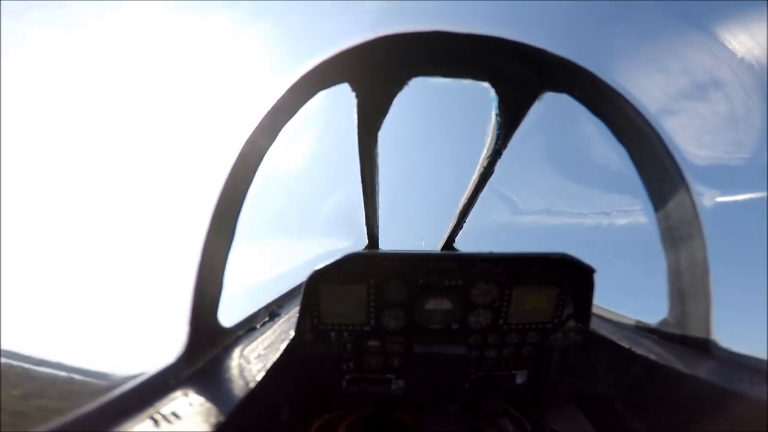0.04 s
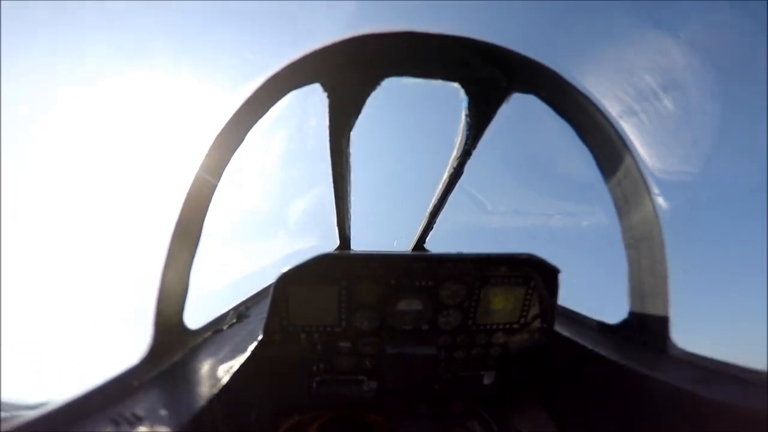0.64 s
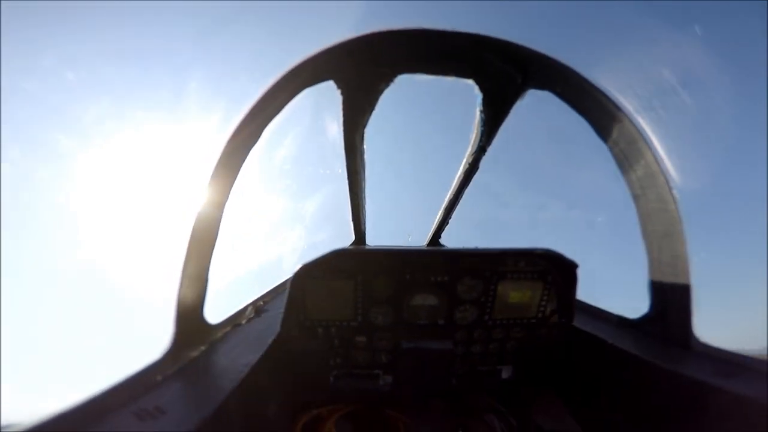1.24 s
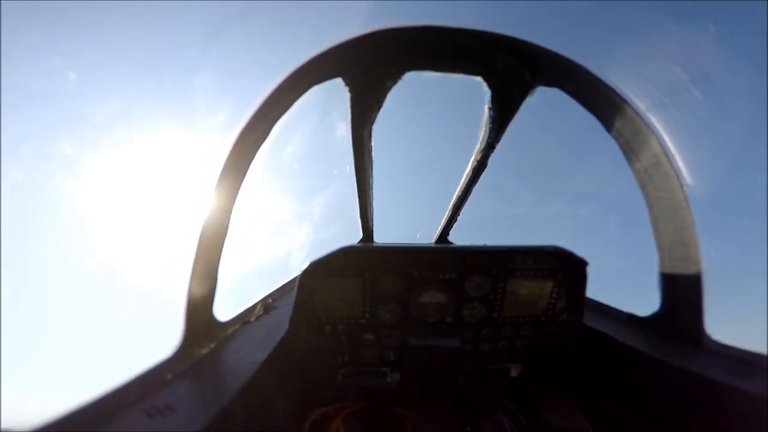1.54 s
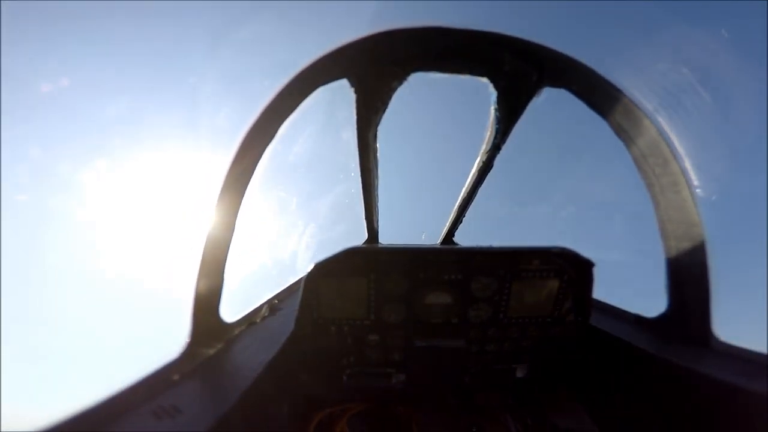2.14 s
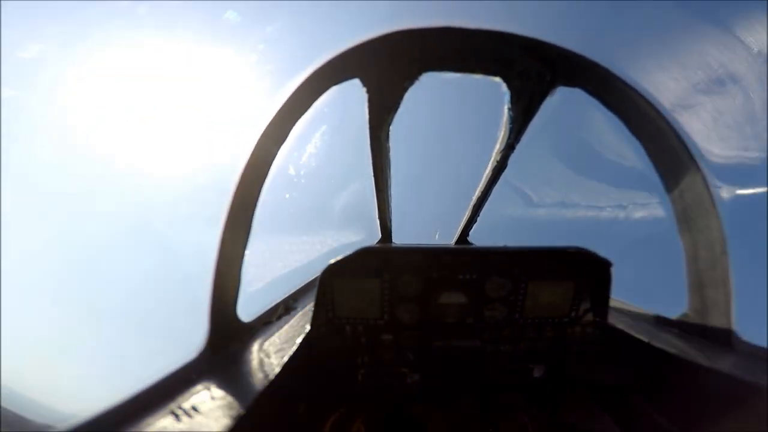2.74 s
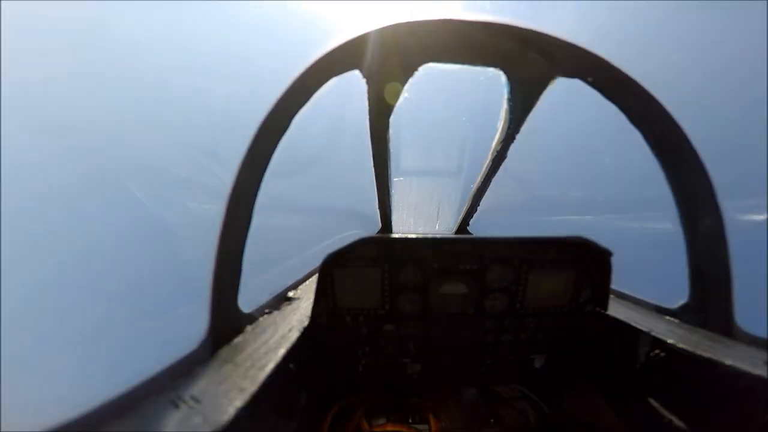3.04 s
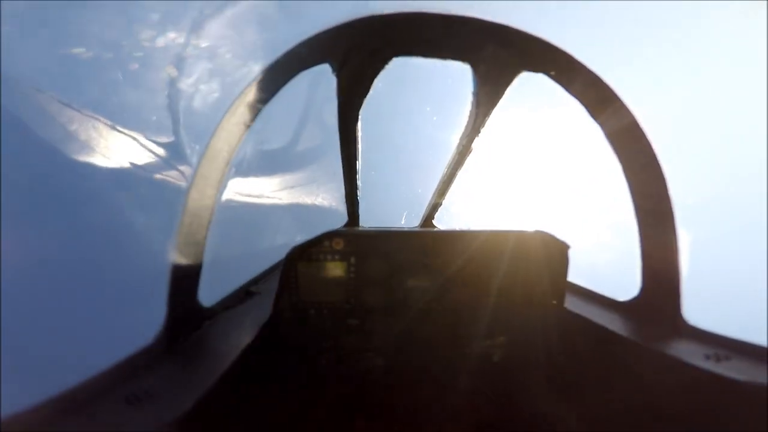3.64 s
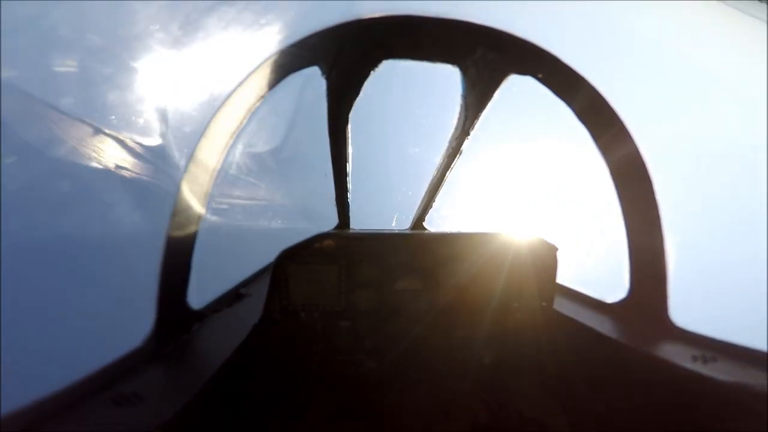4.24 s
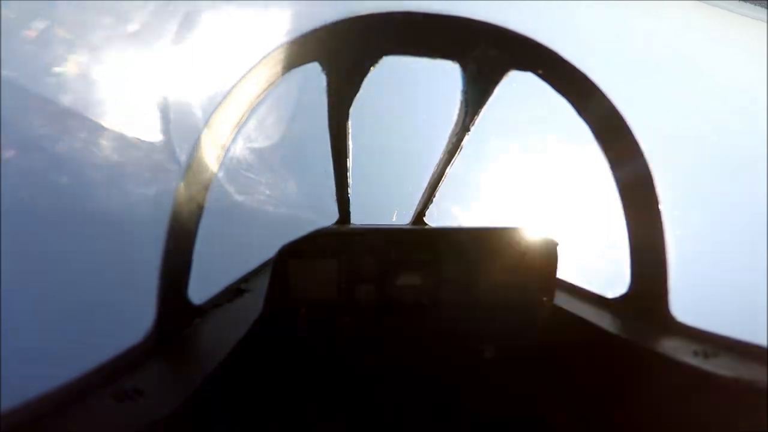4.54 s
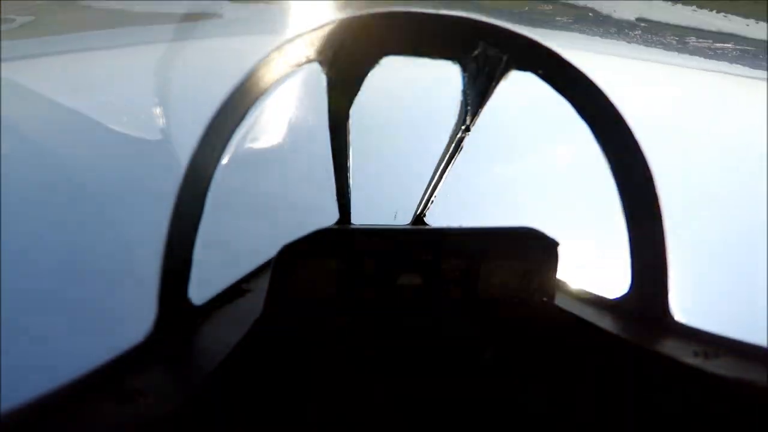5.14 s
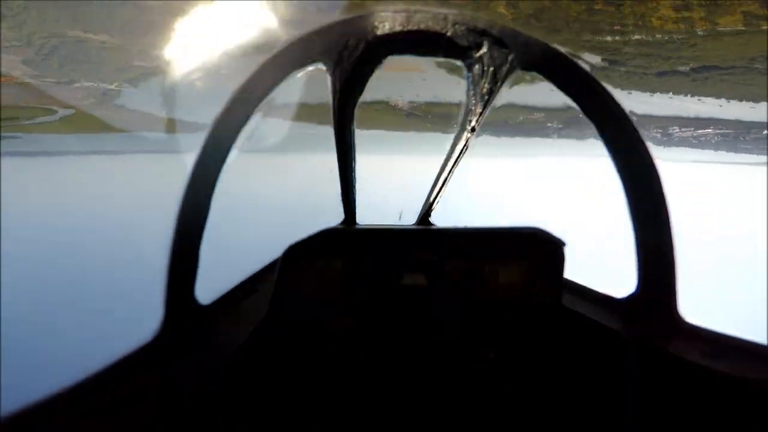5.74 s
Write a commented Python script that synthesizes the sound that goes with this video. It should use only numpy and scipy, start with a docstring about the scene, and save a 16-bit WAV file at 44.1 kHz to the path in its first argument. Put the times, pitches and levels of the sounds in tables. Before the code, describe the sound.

Twin ducted fans drone steadily inside a model jet while buffeting wind turns deeper and rougher about halfway through.

```python
"""A loud, beating hum over a low rumble of air, from a camera microphone in the cockpit of a model jet.
The hum is two electric ducted fans, slightly out of step, shaking the airframe; their whine sits on top.
Air buffets the fuselage and hisses over the canopy. About halfway the jet rolls and pulls into a dive,
and the flow turns deeper and rougher. The camera's limiter rides the loud low end."""
import sys
import numpy as np
from scipy import signal
from scipy.fft import rfft, irfft, next_fast_len
from scipy.io import wavfile
from scipy.ndimage import uniform_filter1d, minimum_filter1d, map_coordinates

SR = 44100
rng = np.random.default_rng(int(sys.argv[2]) if len(sys.argv) > 2 else 0)


def persist_wave(psi):
    """Save psi, clipped to +-1, as 16-bit WAV."""
    counts = np.round(np.clip(psi, -1, 1) * 32767).astype(np.int16)
    wavfile.write(sys.argv[1], SR, np.atleast_2d(counts).T)


N = 260190

# Whine of each fan. Each row: shaft order, relative level in dB in straight flow, then in a full pull.
FIRST_FAN_ORDERS = [(3, -54.5, -53), (4, -60.5, -58.5), (5, -73, -69.5), (7, -69, -61), (8, -80.5, -72.5),
                    (9, -73.5, -75), (10, -74, -68.5), (11, -78, -65), (13, -75, -70), (14, -78, -61),
                    (15, -77.5, -74), (17, -72, -73.5), (22, -89, -86), (24, -73, -65), (30, -99.5, -86.5)]
SECOND_FAN_ORDERS = [(5, -70.5, -59.5), (7, -66, -61.5), (9, -78, -73), (10, -65.5, -62), (11, -79, -69.5),
                     (12, -73, -64.5), (14, -79.5, -69.5), (17, -73.5, -69), (24, -76.5, -70),
                     (30, -98, -87.5)]
# Spectra of the buffeting on the fuselage. Each row: frequency in Hz, relative level in dB.
BUFFET_STRAIGHT_SPECTRUM = [(20, -27), (45, -16.5), (80, -13), (135, -5.5), (178, -4), (215, -0.5),
                            (280, -3), (330, -11.5), (410, -12.5), (480, -22), (570, -18), (700, -28),
                            (900, -41.5), (1300, -79)]
BUFFET_PULL_SPECTRUM = [(20, -32), (45, -16.5), (75, -1), (140, 2), (220, -2), (305, -8), (365, -26),
                        (450, -13), (530, -22), (595, -22.5), (700, -27), (900, -47), (1300, -80)]
# Spectra of the air over the canopy and in the ducts. Each row: frequency in Hz, relative level in dB.
HISS_STRAIGHT_SPECTRUM = [(400, -19.5), (900, -2.5), (1550, 4), (1850, -3.5), (2600, -6), (3300, -10),
                          (4250, -11.5), (5500, -9), (6500, -11.5), (7200, -18.5), (8400, -18.5),
                          (11000, -32), (12300, -24), (15000, -29.5)]
HISS_PULL_SPECTRUM = [(400, -19), (900, -3.5), (1500, -0.5), (1850, -6), (2600, -8), (3350, -13),
                      (4250, -12), (5700, -5), (7000, -17.5), (7700, -18), (9700, -28.5), (11100, -37),
                      (12200, -24), (15000, -37)]
# Resonances of the hollow fuselage and of the ducts.
# Each row: centre in Hz, width in Hz, lift in dB in straight flow, then in a full pull.
FUSELAGE_MODES = [(176.2, 27, 6.5, 0.5), (249, 17, 0, 2), (587, 32, -1, 5.5)]
DUCT_MODES = [(1374, 89, 5, 11), (2210, 110, 4, 0.5), (2630, 160, 4, 4), (3910, 170, 6, 5.5),
              (4670, 180, 3, 3.5), (6070, 230, 1.5, 9.5), (6640, 150, 0.5, 4), (7560, 200, 3, 4),
              (8200, 180, 1, 1), (9140, 250, 3.5, 2.5), (10500, 100, 3, 17), (14600, 350, 2.5, -0.5)]
# Rush of air, weakest at the top of the climb. Each row: time in seconds, relative level in dB.
AIR_RUSH = [(0.1, -40.5), (0.46, -42.5), (0.89, -42.5), (2.2, -47), (3.26, -46.5), (4.32, -42.5),
            (5.8, -44.5)]

BLADE_COUNT = 12
PULL_S, EASE_S = 3.45, 4.2  # the pull is half built, then starts to ease
HUM_DB, HUM_SINK_DB, SINK_S, SINK_HALF_LENGTH_S = -10.5, 2.5, 4.2, 0.81
OCTAVE_DB, OCTAVE_SWELL_DB, OCTAVE_DROP_DB = -45.5, 8.5, 5
OCTAVE_PEAK_S, OCTAVE_RISE_S, OCTAVE_SETTLE_S, OCTAVE_DROP_S = 2.1, 0.73, 0.9, 0.39
TIME = np.arange(N) / SR


def fan_hum(first, second, second_db, sum_db, waver_db, octave_waver_db):
    """Rotor imbalance shakes the airframe around the microphone; the fans beat about 13 times a second."""
    # the once-a-turn hum sinks for a while as the pull builds
    sink = np.exp(-((TIME - SINK_S) / SINK_HALF_LENGTH_S) ** 4)
    hum_db = HUM_DB - HUM_SINK_DB * sink + waver_db * wobble(9.3)
    hum = np.sin(first) + amp(second_db + wobble(2.0)) * np.sin(second)
    # the flexing frame adds the octave and the sum of both speeds; they swell, settle, then drop
    since_peak = TIME - OCTAVE_PEAK_S
    rise = np.clip(1 + since_peak / OCTAVE_RISE_S, 0, 1)
    swell = rise * np.exp(-np.maximum(since_peak, 0) / OCTAVE_SETTLE_S)
    drop = np.clip((TIME - EASE_S) / OCTAVE_DROP_S, 0, 1)
    octave_db = OCTAVE_DB + OCTAVE_SWELL_DB * swell - OCTAVE_DROP_DB * drop
    octave_db += octave_waver_db * wobble(7.9)
    octave = np.sin(2 * first) + amp(sum_db) * np.sin(first + second)
    return np.sqrt(2) * (amp(hum_db) * hum + amp(octave_db) * octave)


def shaft_angle(start_hz, sag_hz_per_s, jitter_hz):
    """Angle in radians of a rotor that slowly loses speed and trembles a little."""
    speed_hz = start_hz - sag_hz_per_s * TIME + jitter_hz * wobble(25)
    return 2 * np.pi * (np.cumsum(speed_hz) / SR + rng.random())


def fuselage_buffet(eddy_size, level_db):
    """Eddies drum on the hollow fuselage, close on all sides; larger ones sound deeper."""
    drumming = turbulence(BUFFET_STRAIGHT_SPECTRUM, BUFFET_PULL_SPECTRUM, FUSELAGE_MODES, eddy_size)
    return amp(level_db) * drumming


def canopy_hiss(pull, level_db, brighten, split_hz):
    """Air rushes over the canopy and rings in the ducts; a stronger rush is also brighter."""
    air = turbulence(HISS_STRAIGHT_SPECTRUM, HISS_PULL_SPECTRUM, DUCT_MODES, pull)
    rush_db = air_rush_db()
    low = filtered(air, lambda hz: 1 / (1 + (hz / split_hz) ** 6))
    treble = (air - low) * amp(brighten * (rush_db - rush_db.max()))
    return (low + treble) * amp(rush_db + level_db)


def fan_whine(angle, orders, pull, gain_db, waver_db):
    """Overtones of one rotor; each wavers as the blades chop uneven air."""
    whine = np.zeros(N)
    for order, straight_db, pull_db in orders:
        level_db = straight_db + pull * (pull_db - straight_db) + gain_db + waver_db * wobble(11)
        whine += amp(level_db) * np.sin(order * angle + 2 * np.pi * rng.random())
    return np.sqrt(2) * whine


def blade_whistle(angle, pull, level_db, follows_rush, skew_loss_db, waver_db):
    """Blades whistle faintly past the stators: louder in a fast rush, fading as the inflow skews."""
    rush_db = air_rush_db()
    tone_db = level_db + follows_rush * (rush_db - rush_db.max()) - skew_loss_db * pull
    tone_db += waver_db * wobble(8)
    return np.sqrt(2) * amp(tone_db) * np.sin(BLADE_COUNT * angle)


def manoeuvre(midpoint_s, rise_s, ease_per_s):
    """Share 0-1 of the full pull: it builds smoothly, then may ease a little."""
    build = 1 / (1 + np.exp((midpoint_s - TIME) / rise_s))
    return np.clip(build - ease_per_s * np.maximum(TIME - EASE_S, 0), 0, 1)


def air_rush_db():
    """Relative level of the passing air at each sample."""
    return np.interp(TIME, *np.transpose(AIR_RUSH))


def turbulence(straight, pulled, modes, share):
    """Resonant noise of rms 1 whose colour slides from straight flow to a full pull as share grows."""
    white = rng.standard_normal(N)
    calm = unit_rms(filtered(white, lambda hz: amp(spectrum_db(straight, hz) + lift_db(modes, hz)[0])))
    skewed = unit_rms(filtered(white, lambda hz: amp(spectrum_db(pulled, hz) + lift_db(modes, hz)[1])))
    return unit_rms((1 - share) * calm + share * skewed)


def lift_db(modes, hz):
    """Bell-shaped lift from resonances: one row for straight flow, one for a full pull."""
    centre, width, *lifts = np.transpose(modes)
    bells = np.exp(-2 * ((hz - centre[:, None]) / width[:, None]) ** 2)
    return np.array(lifts) @ bells


def spectrum_db(points, hz):
    """Level of a spectrum, read between its points on a log frequency axis."""
    point_hz, point_db = np.transpose(points)
    return np.interp(np.log(hz + 1), np.log(point_hz + 1), point_db)


def filtered(x, response):
    """Shape x with a gain that depends on frequency."""
    size = next_fast_len(N + SR // 2)
    return irfft(rfft(x, size) * response(np.fft.rfftfreq(size, 1 / SR)), size)[:N]


def wobble(rate):
    """A smooth random curve, rate knots a second."""
    knots = rng.standard_normal(int(N * rate / SR) + 4)
    return map_coordinates(knots, [TIME * rate])


def amp(db):
    """Decibels to gain."""
    return 10 ** (np.asarray(db) / 20)


def unit_rms(x):
    """Scale to rms 1."""
    return x / np.sqrt(np.mean(x ** 2) + 1e-20)


def limiter_gain(x, ceiling_db, knee, hold_s, ramp_s):
    """The camera's gain ducks softly just ahead of each peak, holds briefly and comes back."""
    hold, ramp = int(hold_s * SR), int(ramp_s * SR)
    needed = (1 + (np.abs(x) / amp(ceiling_db)) ** knee) ** (-1 / knee)
    held = minimum_filter1d(needed, hold + ramp, origin=hold // 2)
    return uniform_filter1d(uniform_filter1d(held, ramp // 2), ramp // 2)


def scene():
    """Both fans and the airflow at close range, in mono from inside the cockpit."""
    pull = manoeuvre(PULL_S, rise_s=0.44, ease_per_s=0.12)  # skews the air entering the ducts
    eddy_size = manoeuvre(PULL_S - 0.5, rise_s=0.65, ease_per_s=0)  # eddies grow ahead of the pull
    first = shaft_angle(start_hz=431.4, sag_hz_per_s=0.04, jitter_hz=0.035)
    second = shaft_angle(start_hz=445.0, sag_hz_per_s=0.32, jitter_hz=0.1)
    fans = fan_hum(first, second, second_db=-15.5, sum_db=-10.5, waver_db=0.25, octave_waver_db=1.8)
    fans += blade_whistle(first, pull, level_db=-56.5, follows_rush=0.9, skew_loss_db=11.5, waver_db=1.0)
    fans += fan_whine(first, FIRST_FAN_ORDERS, pull, gain_db=0.5, waver_db=1.5)
    fans += fan_whine(second, SECOND_FAN_ORDERS, pull, gain_db=2.5, waver_db=1.5)
    air = fuselage_buffet(eddy_size, level_db=-8.0)
    air += canopy_hiss(pull, level_db=5.0, brighten=0.3, split_hz=3400)
    return (fans + air)[None]


def record(dry):
    """The on-board camera limits the loud low end, ducks the treble less and cuts off the very top."""
    split_hz, top_hz, fade_in_s = 900, 15150, 0.003
    gain = limiter_gain(dry[0], ceiling_db=-0.5, knee=4.3, hold_s=0.0081, ramp_s=0.0056)
    low = signal.sosfiltfilt(signal.butter(4, split_hz, fs=SR, output="sos"), dry[0])
    limited = low * gain + (dry[0] - low) * gain ** 0.62
    limited *= np.minimum(TIME / fade_in_s, 1)
    band_limit = signal.ellip(10, 0.1, 90, top_hz, fs=SR, output="sos")
    return signal.sosfilt(band_limit, limited)[None]


dry = scene()
out = record(dry)
persist_wave(out)
```